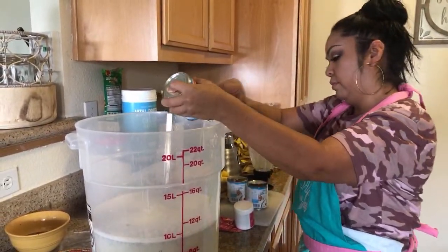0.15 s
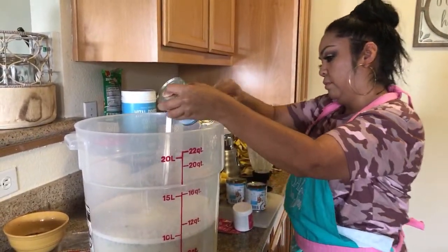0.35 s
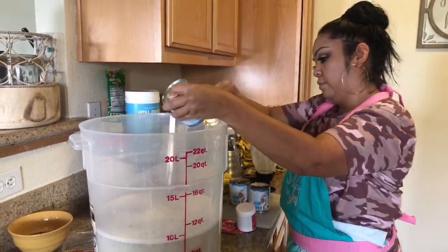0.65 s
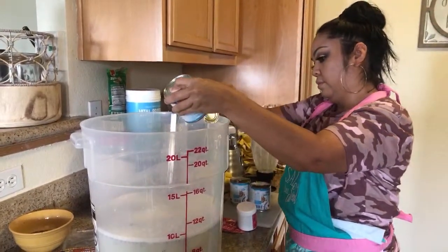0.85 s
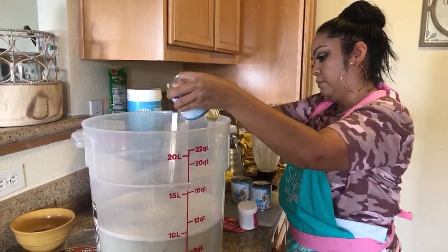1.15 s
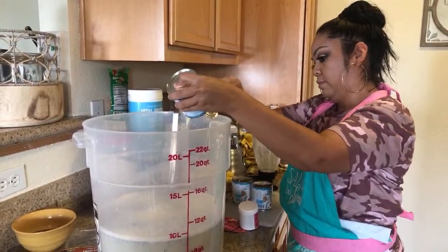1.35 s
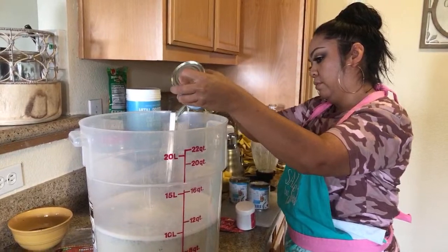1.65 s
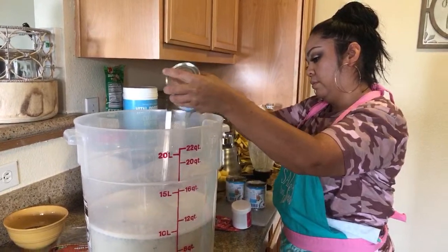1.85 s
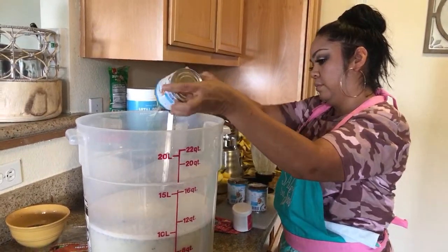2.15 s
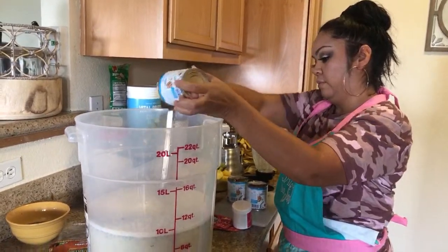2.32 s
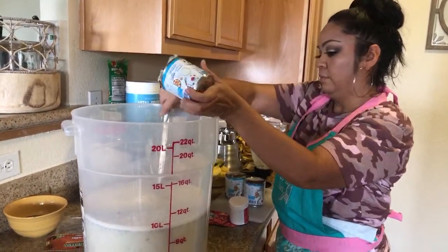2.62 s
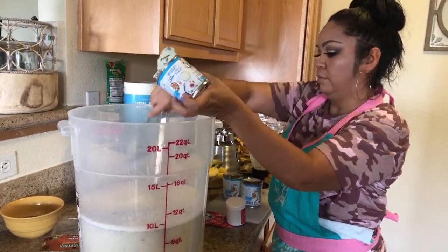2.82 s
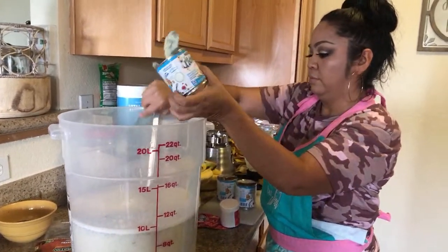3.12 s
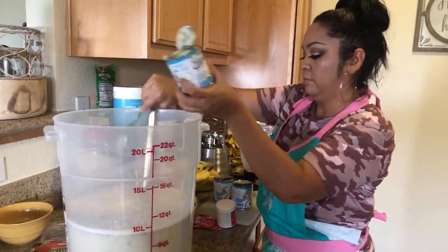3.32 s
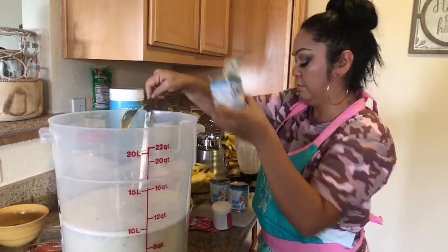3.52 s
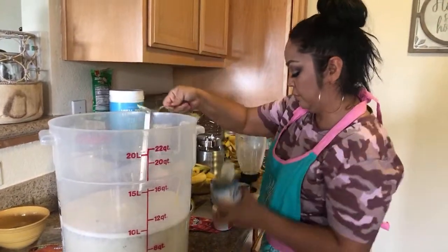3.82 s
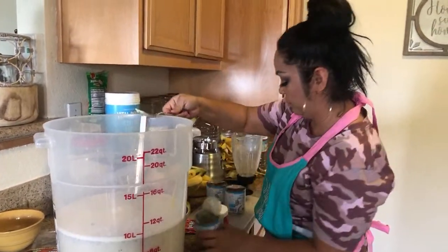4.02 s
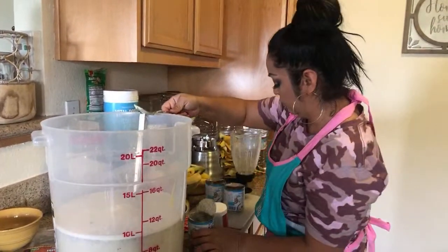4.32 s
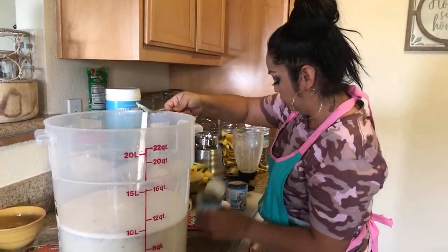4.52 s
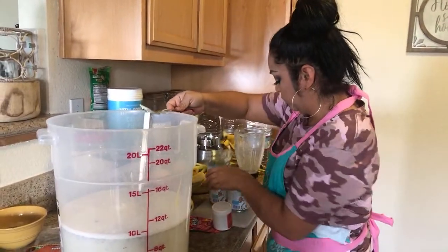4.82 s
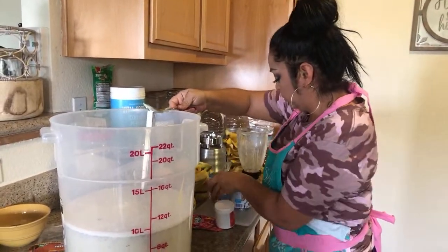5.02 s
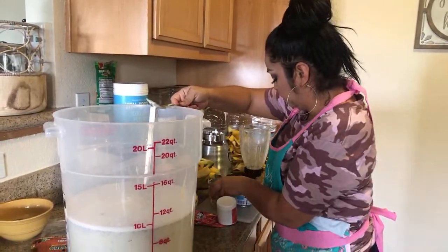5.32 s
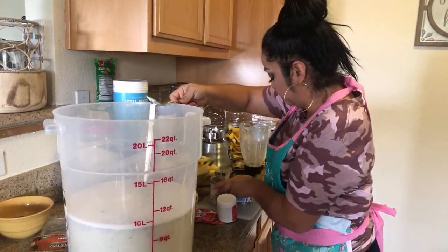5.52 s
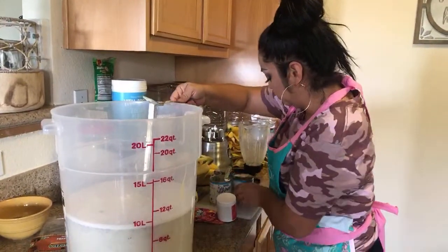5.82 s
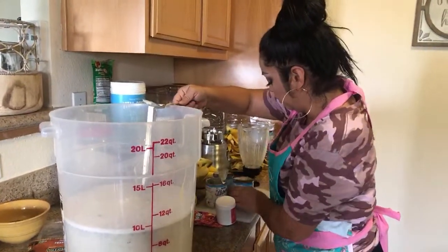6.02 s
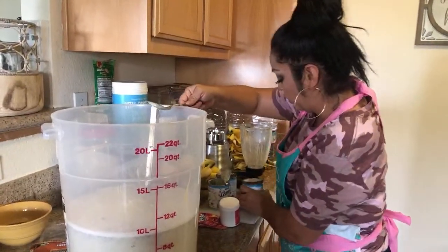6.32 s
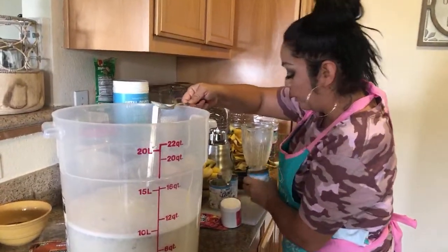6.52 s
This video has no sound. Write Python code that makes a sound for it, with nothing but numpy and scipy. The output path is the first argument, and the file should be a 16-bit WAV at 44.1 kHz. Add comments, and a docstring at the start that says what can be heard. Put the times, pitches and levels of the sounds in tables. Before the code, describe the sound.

Close mono pickup in a reverberant kitchen: irregular scratchy scrapes and tinny knocks inside a can, a small rustling clank, then four strong spoon raps on a plastic tub with a boomy body. An emptied can is set down with a ringing clunk; later another can is bumped loudly, followed by soft sliding and slight rustling. Faint hum and a fading low rumble lie behind.

```python
"""First a steel spoon scrapes and knocks inside a tin can held over a big plastic tub, then raps the tub's rim.
Cans are put down and nudged on the counter, with thumps, rustles and slides. An appliance hums behind,
a low rumble fades away, and twice the whole level dips for a moment. Knocks are noisy forces ringing
resonances; scrapes are random slips through the can; a small hard kitchen answers both."""
import sys
import numpy as np
from scipy import signal
from scipy.fft import rfft, irfft, next_fast_len
from scipy.io import wavfile
from scipy.ndimage import map_coordinates

SR = 44100
rng = np.random.default_rng(int(sys.argv[2]) if len(sys.argv) > 2 else 0)


def to_wav(s):
    """Save 16-bit WAV."""
    ch = np.atleast_2d(s).T  # columns
    pcm = np.round(np.clip(ch, -1, 1) * 32767)  # PCM
    wavfile.write(sys.argv[1], SR, pcm.astype(np.int16))


N = 293706

# Room tone spectrum: f/Hz, density/dB per Hz (relative)
ROOM_TONE = [(15, -76), (25, -39.5), (111, -9.5), (170, -15.5), (206, -3), (242, -14), (277, -6),
             (326, -14.5), (489, -16), (591, -23.5), (677, -20), (754, -21.5), (911, -21.5), (2220, -32.5),
             (16000, -47.5)]
# Appliance hum lines: f/Hz, level/dB
HUM_LINES = [(118.4, -75), (204.6, -64.5), (269.2, -81), (355.3, -68), (409.1, -68), (484.5, -69),
             (1523, -77), (1642, -79.5)]
# Low rumble: peak t/s, level/dB, build-up/s
RUMBLE_SWELL = (0.44, -52, 0.8)
# Counter shaking: t/s, f/Hz, level/dB before its build-up
COUNTER_THUMPS = [(1.55, 71.3, -50), (1.92, 76, -68), (2.69, 70, -47.5), (2.921, 70, -47),
                  (3.13, 68.6, -47), (4.17, 70.4, -58), (5.322, 161, -44)]
# Crisp rustles: peak t/s, level/dB, build-up/s
RUSTLE_SWELLS = [(1.79, -71, .03), (1.91, -60, 0.081), (5.8, -65.5, .03), (5.91, -77, .03),
                 (6.584, -67.5, 0.08)]
# Soft slides on the counter: peak t/s, level/dB, build-up/s
SLIDE_SWELLS = [(5.65, -68, 0.11), (6.256, -59, 0.21), (6.352, -55, 0.013)]

# Contacts, four tables: t/s, wall energy/dB, boom/dB, hollow/dB, click/dB (all three re wall),
# favoured f/Hz (the spot struck favours resonances near it)
CAN_NUDGES = [(5.3162, -0.4, -9.5, 4.8, -28.5, 1180), (5.4937, -20, 2, 2.5, -43, 1040),
              (5.5509, -36, -1, 1.1, -27, 1114), (6.3495, -38, 2, 5.8, -48, 1090),
              (6.5747, -39, 16.5, 2.5, -1, 2190)]
CAN_CLANKS = [(1.917, -21.5, 1, 6, -2, 5940), (1.9751, -13, -8, -0.5, -8, 4200),
              (4.1643, 1.5, -11, 5.5, -15.5, 550)]
TUB_RAPS = [(1.5444, -21.5, 8, 8, -46, 650), (2.665, -35, 8, 4.1, -47, 734),
            (2.6867, 2.5, 3, 0.51, -15.5, 740), (2.9145, 7, 6.5, 1.7, -12, 3560),
            (3.1258, -0.66, 9, 2.6, -6.5, 655), (3.2815, -5.5, 6, 1.1, -17.5, 766)]
SPOON_KNOCKS = [(0.0925, -20.5, 1.5, 3, -11.5, 804), (0.3072, -16, 11.5, -7, -2.5, 4140),
                (0.441, -16.5, -15, 9, 0.5, 7900), (0.5437, -16, -9, 2.5, -8, 1290),
                (0.6085, -19, 14.5, 2, -13, 1740), (0.7128, -4, -2, -17, -18.5, 2790),
                (0.8954, -20, 7.5, 7, -7.5, 6400), (0.9478, -7.5, -10, -6, -19, 2840),
                (1.1084, -18.5, -25, 1, -16, 4230), (1.1619, -20.5, 1.5, 2.5, -9.5, 1070),
                (1.2396, -13, -1.5, -5, -24, 2800), (1.3644, -34.5, 0, -4, 10.5, 5800)]
# Scraping strokes: t/s of full pressure, wall/dB, hollow/dB, build-up/s, favoured f/Hz
SCRAPE_STROKES = [(0.19, -57, -59, 0.088, 3040), (0.312, -54, -75, 0.023, 4200),
                  (0.442, -45.5, -35.5, 0.068, 7140), (0.6, -47.5, -59, 0.085, 3500),
                  (0.72, -38.5, -29, 0.06, 1780), (0.952, -41, -37, 0.028, 2720),
                  (1.11, -62, -43.5, .02, 4200), (1.2, -53.5, -54, 0.086, 3970),
                  (1.26, -55, -54, .02, 2930), (1.37, -61.5, -50, 0.032, 5960)]

# Ranges of boom, hollow, wall, clink, click: low f/Hz, high f/Hz
PART_RANGES = [(150, 450), (450, 1300), (1300, 2300), (2300, 5000), (5000, 15000)]
# Resonances, four tables: f/Hz, width/Hz, level/dB before scatter and balance
# Another can
SECOND_CAN_MODES = [(301, 28, -8), (586.5, 27, 5.5), (943, 25, -5.5), (1103, 58, -4), (1270, 150, -14),
                    (1873, 60, -35), (1990, 18, -20), (2320, 55, -27), (3000, 37, -22), (3980, 50, -13)]
# The emptied can
EMPTY_CAN_MODES = [(303, 24, -9), (582.6, 26.5, -0.5), (940, 13, -7), (1502, 51, -4), (1870, 27, -15),
                   (2547, 18, -14.5), (3065, 100, -11.5), (3970, 120, -20), (4740, 52, -40),
                   (5810, 75, -39), (8500, 620, -30), (13400, 3000, -27)]
# Plastic tub
TUB_MODES = [(161.7, 6.7, -16.5), (233.5, 41, -13), (323, 20.4, 0), (653, 93, -10.5), (769, 230, -4),
             (960, 110, -13), (1202, 100, -6.5), (1300, 110, -12), (1645, 300, -10), (3320, 192, -23.5),
             (3940, 240, -21)]
# Can still coated with cream, leaning on the tub
CREAM_CAN_MODES = [(312, 37, 6.5), (670, 67, 8), (992, 60, -6), (1226, 26, -8), (1797, 15, -2.5),
                   (2100, 31, -46), (2487, 26, -7), (2640, 72, -14), (2920, 15, -31), (3215, 130, -9.5),
                   (3750, 34, -2), (4050, 190, -8.5), (5640, 37, -15), (6600, 66, -21), (7200, 41, -57)]

# Kitchen decay: f/Hz, t60/s
KITCHEN_T60 = [(150, 0.49), (400, 0.32), (1000, 0.42), (3000, .39), (8000, 0.38), (15000, 0.24)]
# Nearest hard surfaces: delay/s, level/dB
NEAR_ECHOES = [(.011, -5.5), (.019, -10)]
# Microphone colour: f/Hz, width/Hz, gain/dB
MIC_COLOUR = [(4200, 900, -0.5), (7300, 600, -2), (10400, 350, -4), (14700, 2700, 2.5)]
# Level dips: t/s, half length/s, gain/dB
LEVEL_DIPS = [(5.535, 0.009, -13), (5.88, 0.0071, -14)]

ROOM_TONE_DB = -56.5
RUMBLE_HZ, RUMBLE_RELEASE_S = 83, 1.1
THUMP_T60_S = 0.51
RUSTLE_RELEASE_S, SLIDE_RELEASE_S, STROKE_RELEASE_S = 0.11, 0.11, 0.068
MODE_SCATTER_DB = 2  # standard deviation of each mode's level, redrawn per blow or stroke
TOP_HZ = 16050


def amp(db):
    """dB to amplitude."""
    return 10 ** (np.asarray(db) / 20)


def unit(x):
    """x at RMS 1."""
    return x / np.sqrt(np.mean(x ** 2) + 1e-20)


def along(points, hz):
    """Interpolates (Hz, value) points on a log axis."""
    f, v = np.transpose(points)
    return np.interp(np.log(hz + 1), np.log(f + 1), v)


def wobble(rate_hz):
    """Smooth random curve, rate_hz knots a second."""
    knots = rng.standard_normal(int(N * rate_hz / SR) + 4)
    return map_coordinates(knots, [np.arange(N) * rate_hz / SR])


def causal(gain):
    """Minimum-phase response with this gain, by folding the cepstrum."""
    cepstrum = irfft(np.log(gain + 1e-6))
    half = len(cepstrum) // 2
    cepstrum[1:half] *= 2
    cepstrum[half + 1:] = 0
    return np.exp(rfft(cepstrum))


def filtered(x, gain):
    """x through the causal filter with this gain."""
    m = 2 * next_fast_len(len(x) // 2 + SR // 8)
    response = causal(gain(np.fft.rfftfreq(m, 1 / SR)))
    return irfft(rfft(x, m) * response, m)[:len(x)]


def band(x, lo_hz, hi_hz):
    """Butterworth band-pass."""
    sos = signal.butter(2, [lo_hz, hi_hz], "band", fs=SR, output="sos")
    return signal.sosfilt(sos, x)


def swells(rows, release_s):
    """Summed gain of swells: 20 dB up over the build-up, 20 dB down over the release."""
    s, db, rise_s = np.transpose(rows)[..., None]
    t = np.arange(N) / SR - s
    fall = np.maximum(-t / np.maximum(rise_s, 1e-3), t / release_s)
    return amp(db - 20 * fall).sum(0)


def grains(rate_hz, spread_db):
    """Random tiny slips of uneven size."""
    size = amp(spread_db * rng.exponential(size=N)) * rng.standard_normal(N)
    return size * (rng.random(N) < rate_hz / SR)


def room_tone():
    """Shaped noise whose level sways a little."""
    air = unit(filtered(rng.standard_normal(N), lambda hz: amp(along(ROOM_TONE, hz))))
    return amp(ROOM_TONE_DB + 0.96 * wobble(4.24)) * air


def appliance_hum():
    """Steady tones wavering in level and phase."""
    t = np.arange(N) / SR
    out = np.zeros(N)
    for hz, db in HUM_LINES:
        level = amp(db + 2.2 * wobble(3.33))
        out += level * np.sin(2 * np.pi * hz * t + 0.3 * wobble(21))
    return out


def low_rumble():
    """One unsteady low note that swells and fades."""
    t = np.arange(N) / SR
    note = np.sin(2 * np.pi * RUMBLE_HZ * t + 0.33 * wobble(6))
    return swells([RUMBLE_SWELL], RUMBLE_RELEASE_S) * amp(0.8 * wobble(8)) * note


def counter_thumps():
    """Heavy contacts shake the counter, which swells and dies on one low note each."""
    s, hz, db = np.transpose(COUNTER_THUMPS)[..., None]
    t = np.maximum(np.arange(N) / SR - s, 0)
    level = amp(db - 60 * t / THUMP_T60_S) * (1 - np.exp(-t / 0.011))
    return (level * np.sin(2 * np.pi * hz * t)).sum(0)


def rustle():
    """Crisp swells of tiny slips in the treble."""
    crisp = unit(band(grains(3100, spread_db=-6), 2200, 9200))
    return swells(RUSTLE_SWELLS, RUSTLE_RELEASE_S) * crisp


def slide():
    """Something soft slides on the counter: slips in a narrow middle band."""
    soft = unit(band(grains(2700, spread_db=2.0), 1050, 1420))
    return swells(SLIDE_SWELLS, SLIDE_RELEASE_S) * soft


def echoes():
    """Dense unit-energy tail that builds up in a few ms; its bands die at their own speed."""
    length = SR * 3 // 5
    hz, t, z = signal.stft(rng.standard_normal(length), SR, nperseg=256)
    decay = amp(-60 * t / along(KITCHEN_T60, hz)[:, None])
    tail = signal.istft(z * decay, SR, nperseg=256)[1][:length]
    tail = tail * (1 - np.exp(-np.arange(len(tail)) / SR / 0.0018))
    return tail / np.linalg.norm(tail)


def kitchen(x, wet_db):
    """Direct sound plus the room."""
    return x + amp(wet_db) * signal.fftconvolve(x, echoes())[:len(x)]


def body(modes, between_db, spot_hz=1000, spot_db=0, scatter_db=0):
    """Gain of resonances adding in power over a falling base, which stands for the many weak ones."""
    hz, width, db = np.transpose(modes)[..., None]
    db = db + scatter_db * rng.standard_normal(hz.shape)

    def gain(f):
        damping = (f * width) ** 2
        peaks = amp(2 * db) * damping / ((hz ** 2 - f ** 2) ** 2 + damping)
        base = amp(2 * between_db) / (1 + (f / 2400) ** 2.43)
        spot = amp(spot_db * np.exp(-(np.log((f + 1) / spot_hz) / 0.14) ** 2))
        return spot * np.sqrt(base + peaks.sum(0))
    return gain


def balanced(gain, parts_db):
    """Tilts a gain smoothly towards the given power per part; small bodies give no deep bass."""
    def tilted(f):
        power = gain(f) ** 2 / len(f)
        tilt = []
        for (lo, hi), db in zip(PART_RANGES, parts_db):
            part_db = 10 * np.log10(power[(f >= lo) & (f < hi)].sum())
            tilt.append((np.sqrt(lo * hi), db - part_db))
        return gain(f) * amp(along(tilt, f)) / np.sqrt(1 + (140 / (f + 1)) ** 10)
    return tilted


def contacts(events, modes, contact_s, clink_db, clink_follows, between_db, spot_db, snap, wet_db):
    """A faint noise lead-in, a chattering blow and its echoes ring the body; the part levels set the mix, the
    spot favours resonances near it within each part."""
    lead = SR // 40  # samples before the blow
    out = np.zeros(N + SR)
    t = np.arange(-lead, SR * 3 // 5) / SR
    u = np.maximum(t, 0) / max(contact_s, 1e-4)
    chatter = np.sqrt(u) * np.exp(-u)
    lead_in = amp(-26.5) * np.exp(np.minimum(t, 0) / 0.0058) * (t < 0)
    impact = snap * np.exp(-((t - contact_s) / .00012) ** 2)  # one clean, rounded hit in the chatter
    for s, db, boom_db, hollow_db, click_db, spot_hz in events:
        blow = rng.standard_normal(len(t)) * (chatter + lead_in)
        blow /= np.linalg.norm(blow)
        blow += impact
        walls = sum(amp(echo_db) * np.roll(blow, round(delay_s * SR)) for delay_s, echo_db in NEAR_ECHOES)
        force = blow + walls + amp(wet_db) * np.pad(echoes(), (lead, 0))
        ring = body(modes, between_db, spot_hz, spot_db, MODE_SCATTER_DB)
        parts_db = (boom_db, hollow_db, 0, clink_db + clink_follows * click_db, click_db)
        sound = filtered(force / np.linalg.norm(force), balanced(ring, parts_db))
        start = round((s - .0015) * SR) - lead  # blow begins 1.5 ms ahead of the table time
        out[start:][:len(t)] += amp(db) * sound
    return out[:N]


def can_nudges():
    """Another can is nudged: hollow ring with little treble, strong room."""
    return contacts(CAN_NUDGES, SECOND_CAN_MODES, contact_s=0.00485, clink_db=9, clink_follows=0.56,
                    between_db=-16.5, spot_db=2, snap=0.077, wet_db=11)


def can_clanks():
    """Contacts ring the emptied can's resonances."""
    return contacts(CAN_CLANKS, EMPTY_CAN_MODES, contact_s=.0066, clink_db=3.7, clink_follows=0.72,
                    between_db=-19.0, spot_db=7.0, snap=0.021, wet_db=5.0)


def tub_raps():
    """The tub's rim is rapped: short blows ring broad plastic resonances."""
    return contacts(TUB_RAPS, TUB_MODES, contact_s=0.00282, clink_db=-3.0, clink_follows=.15,
                    between_db=-35.0, spot_db=1.5, snap=0.16, wet_db=4)


def spoon_scrape():
    """The spoon's edge stutters over the ribs, ringing the wall and the air inside."""
    slips = grains(3000, spread_db=2.0)
    hollow = unit(band(filtered(slips, body(CREAM_CAN_MODES, between_db=-23)), 384, 830))
    out = np.zeros(N)
    for s, wall_db, hollow_db, rise_s, hz in SCRAPE_STROKES:
        ring = body(CREAM_CAN_MODES, between_db=-9, spot_hz=hz, spot_db=4, scatter_db=MODE_SCATTER_DB)
        wall = unit(band(filtered(slips, ring), 970, 18000))
        out += swells([(s, wall_db, rise_s)], STROKE_RELEASE_S) * wall
        out += swells([(s, hollow_db, rise_s)], STROKE_RELEASE_S) * hollow
    return kitchen(out, wet_db=-2.5)


def spoon_knocks():
    """The spoon knocks inside the can; each blow favours the modes near its spot."""
    return contacts(SPOON_KNOCKS, CREAM_CAN_MODES, contact_s=.006, clink_db=2.0, clink_follows=0.19,
                    between_db=-18.5, spot_db=9.0, snap=0.046, wet_db=4)


def scene():
    """Sum of all layers, one channel."""
    background = room_tone() + appliance_hum() + low_rumble()
    counter = counter_thumps() + rustle() + slide() + can_nudges() + can_clanks()
    spoon = tub_raps() + spoon_scrape() + spoon_knocks()
    return (background + counter + spoon)[None]


def record(dry):
    """Two brief level dips, then microphone colour with a bass cut and a band limit."""
    t = np.arange(N) / SR
    dip_db = sum(db * np.exp(-((t - s) / half_s) ** 2) for s, half_s, db in LEVEL_DIPS)

    def microphone(hz):
        colour_db = sum(db * np.exp(-((hz - c) / w) ** 2) for c, w, db in MIC_COLOUR)
        bass_cut = 1 / np.sqrt(1 + (45 / (hz + 1)) ** 4)
        return amp(colour_db) * bass_cut * (hz < TOP_HZ)
    return filtered(dry[0] * amp(dip_db), microphone)[None]


dry = scene()
out = record(dry)
to_wav(out)
```